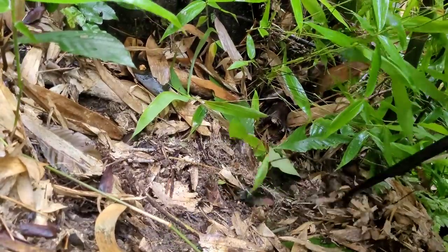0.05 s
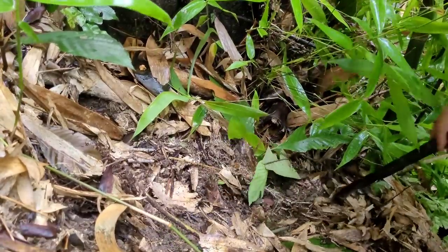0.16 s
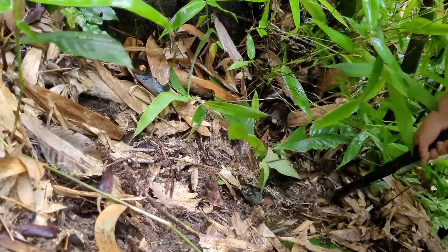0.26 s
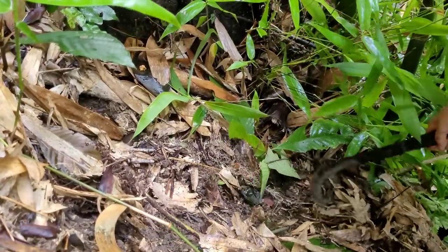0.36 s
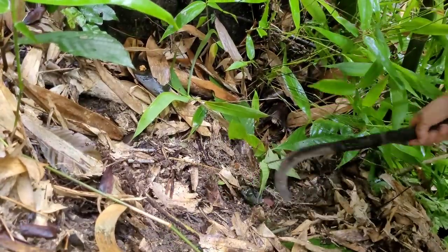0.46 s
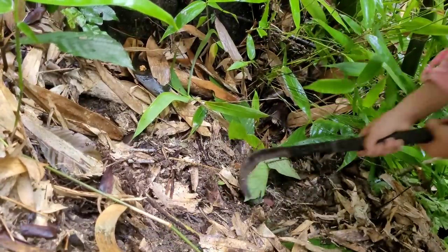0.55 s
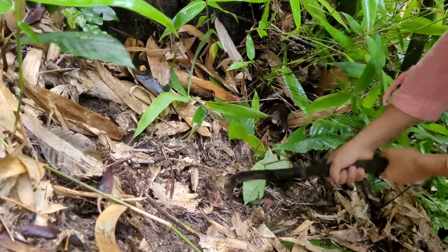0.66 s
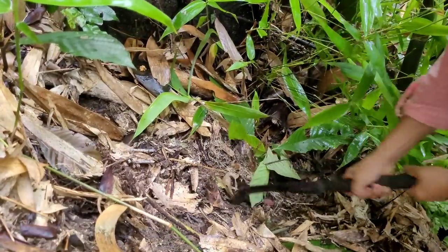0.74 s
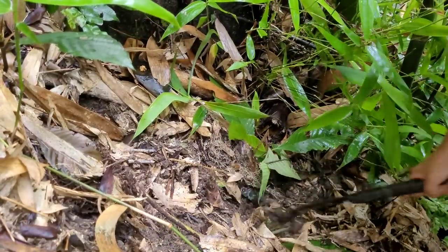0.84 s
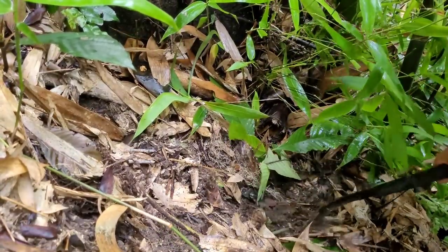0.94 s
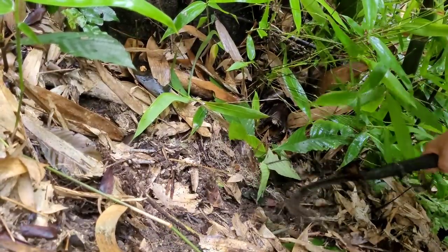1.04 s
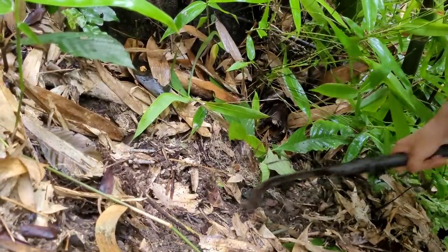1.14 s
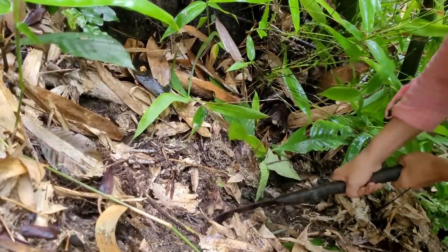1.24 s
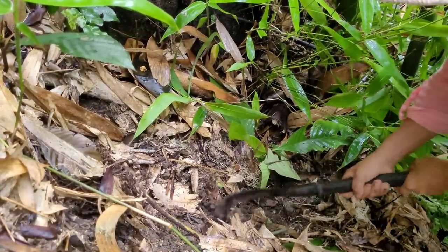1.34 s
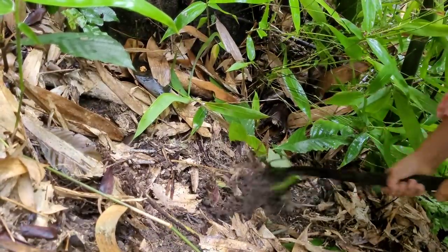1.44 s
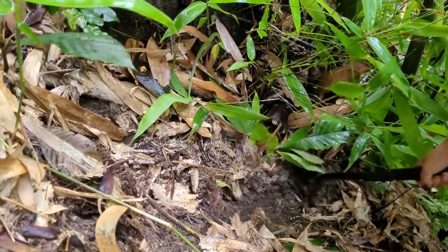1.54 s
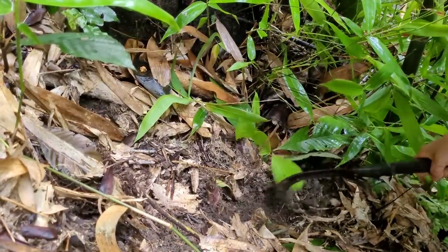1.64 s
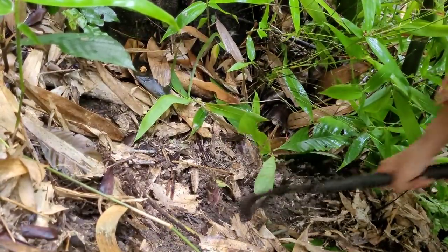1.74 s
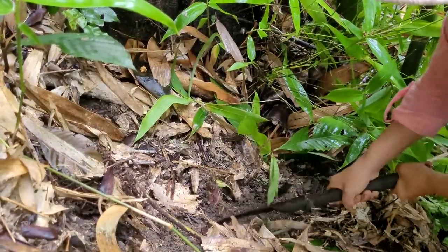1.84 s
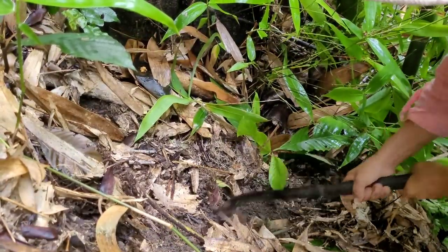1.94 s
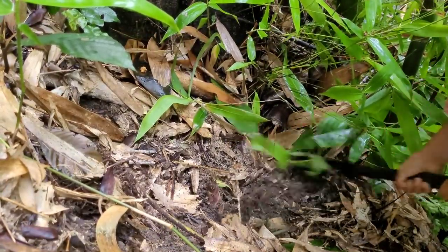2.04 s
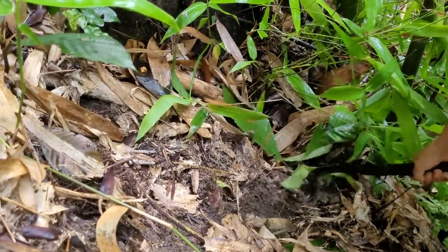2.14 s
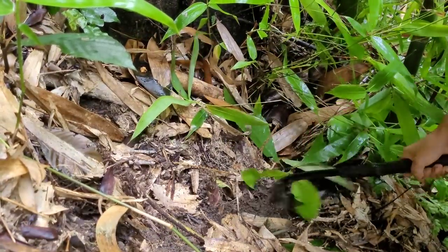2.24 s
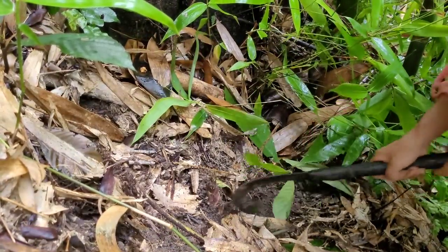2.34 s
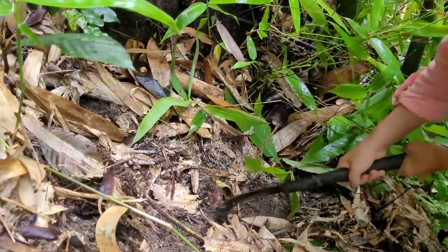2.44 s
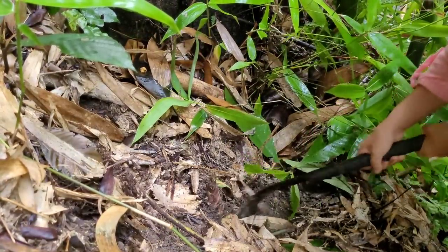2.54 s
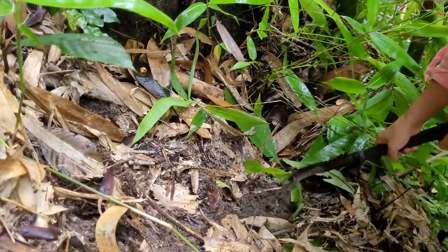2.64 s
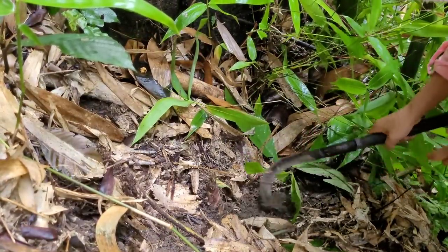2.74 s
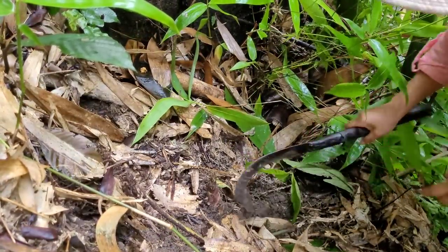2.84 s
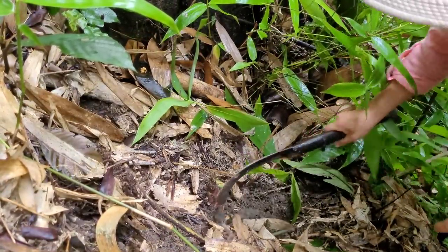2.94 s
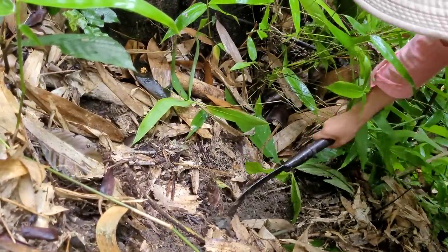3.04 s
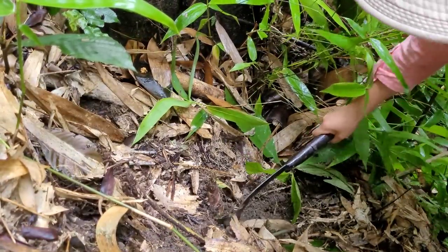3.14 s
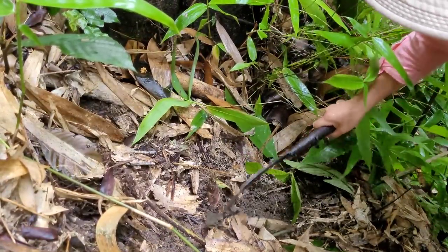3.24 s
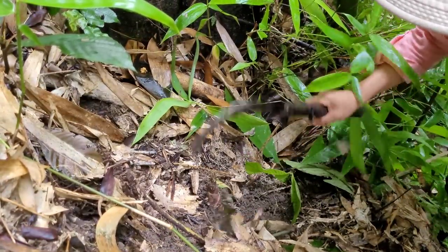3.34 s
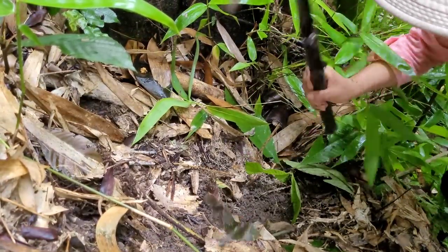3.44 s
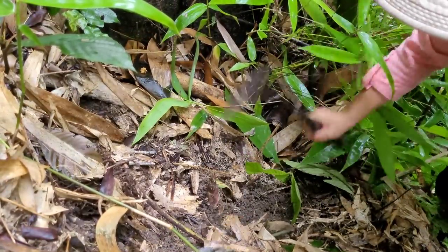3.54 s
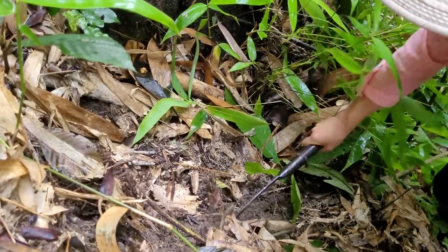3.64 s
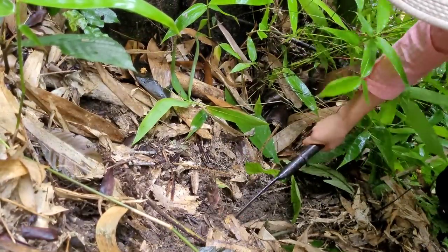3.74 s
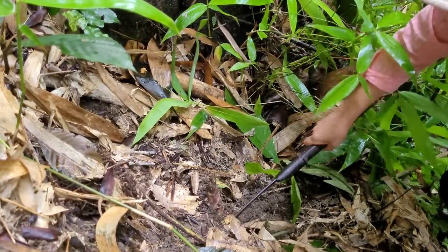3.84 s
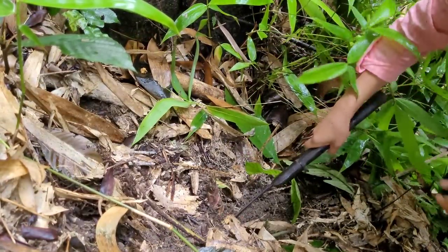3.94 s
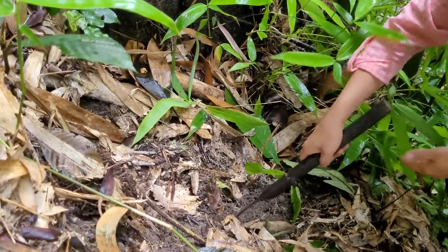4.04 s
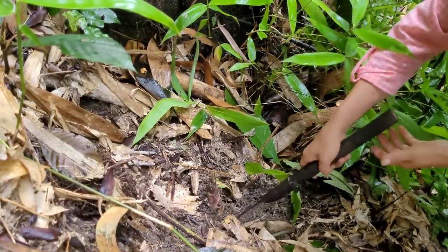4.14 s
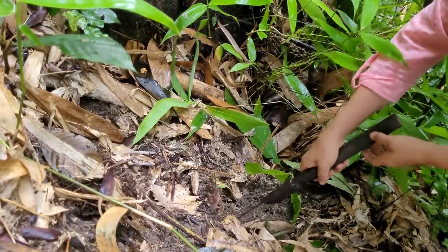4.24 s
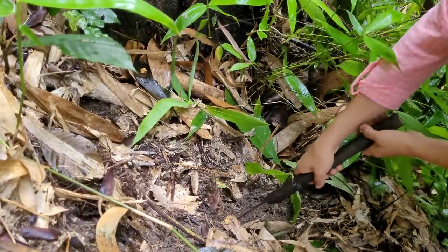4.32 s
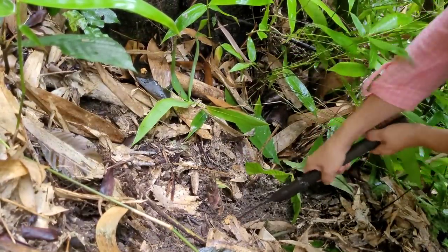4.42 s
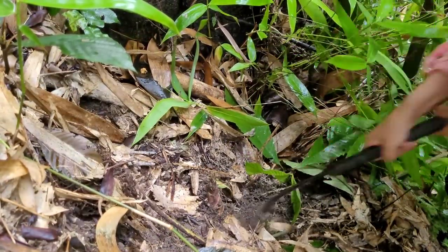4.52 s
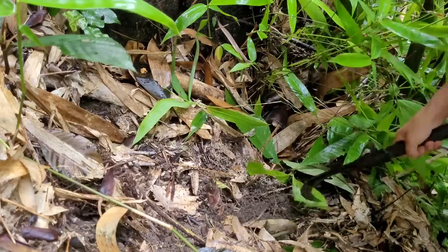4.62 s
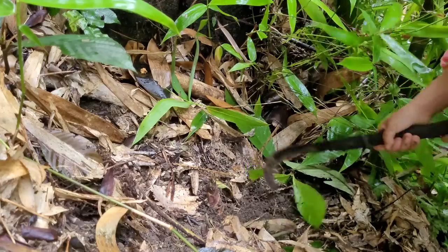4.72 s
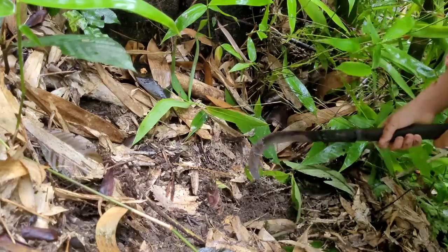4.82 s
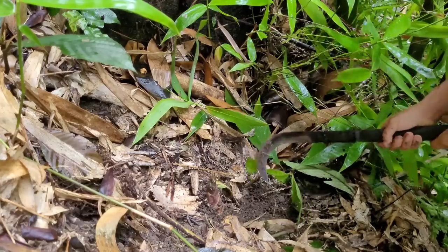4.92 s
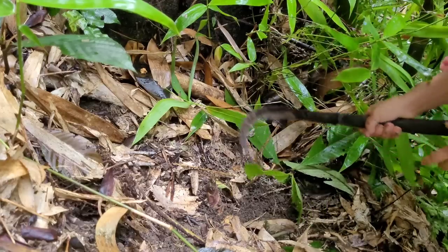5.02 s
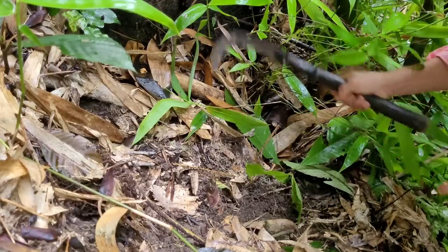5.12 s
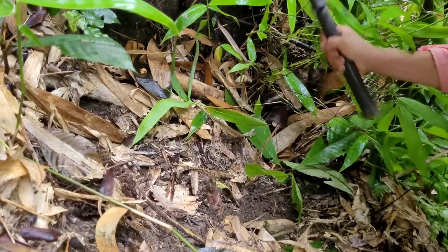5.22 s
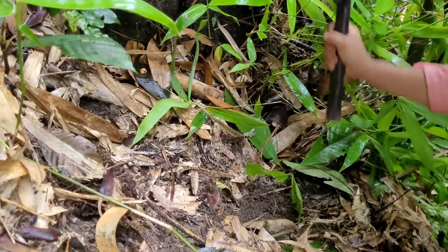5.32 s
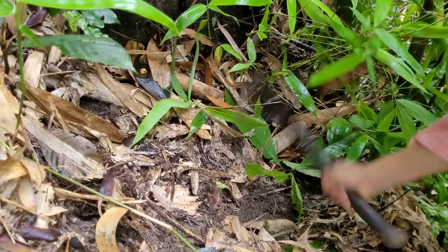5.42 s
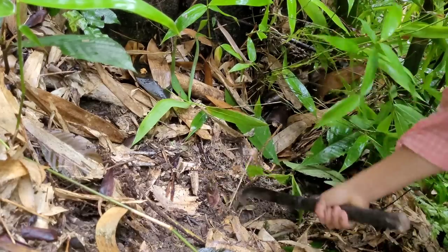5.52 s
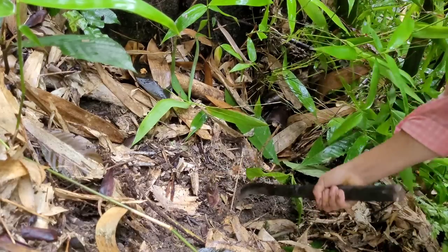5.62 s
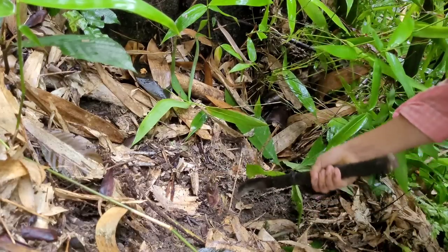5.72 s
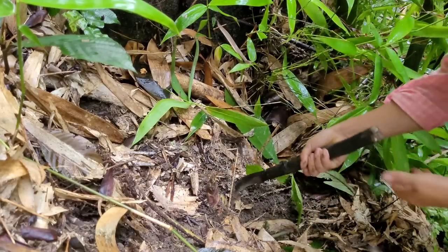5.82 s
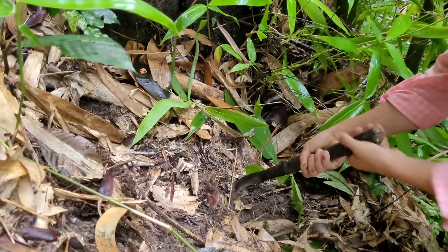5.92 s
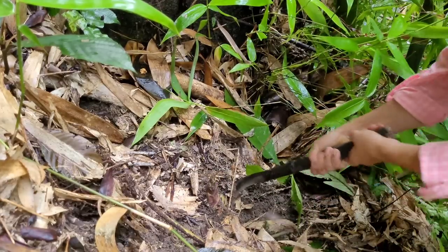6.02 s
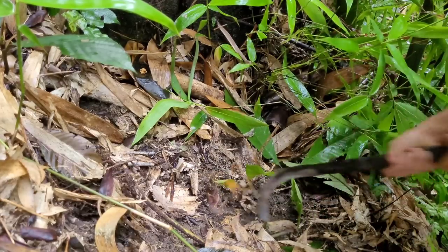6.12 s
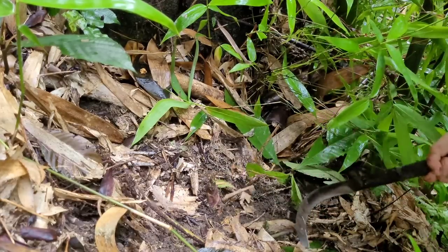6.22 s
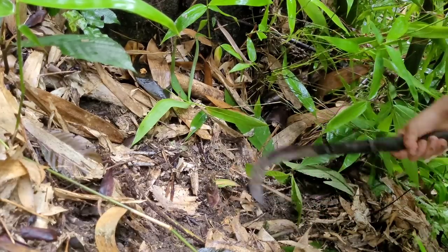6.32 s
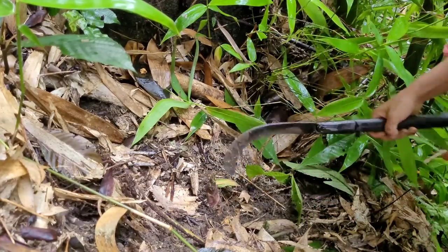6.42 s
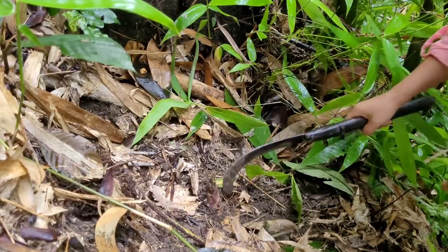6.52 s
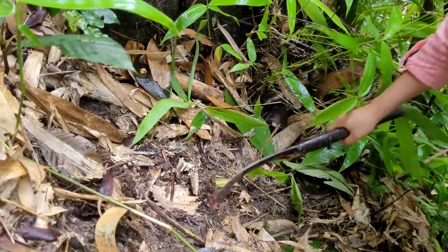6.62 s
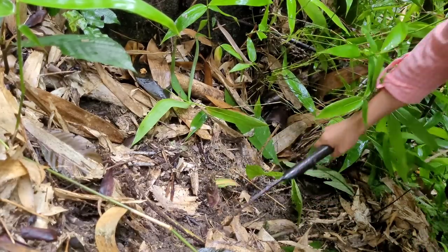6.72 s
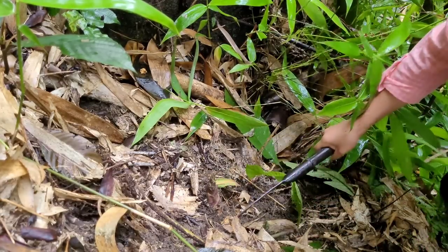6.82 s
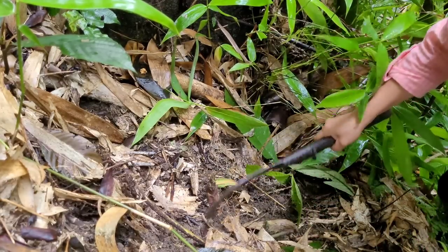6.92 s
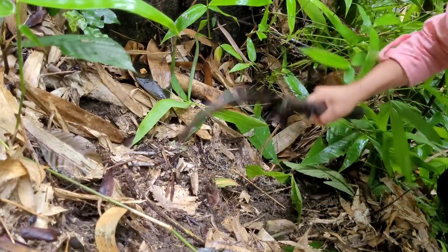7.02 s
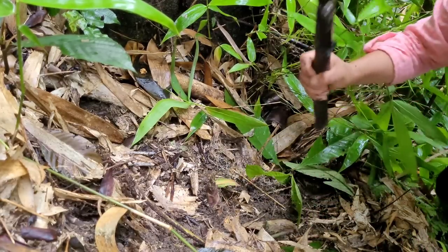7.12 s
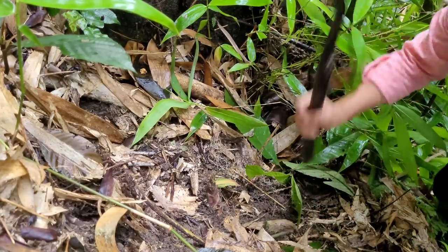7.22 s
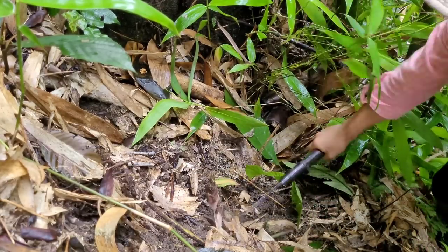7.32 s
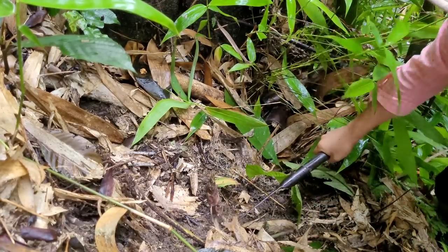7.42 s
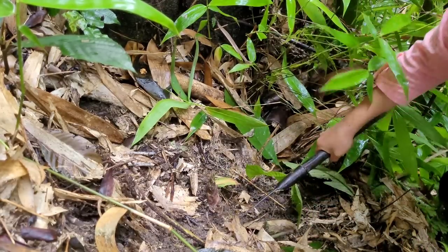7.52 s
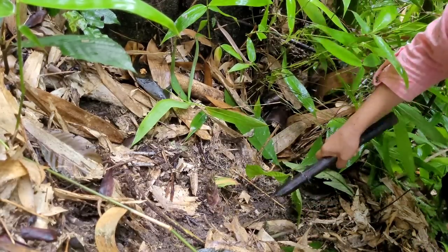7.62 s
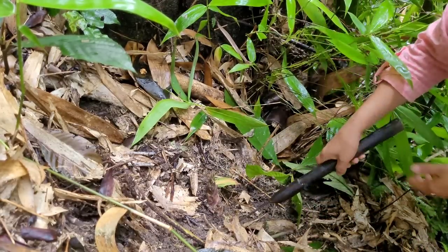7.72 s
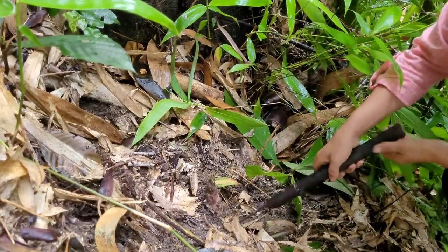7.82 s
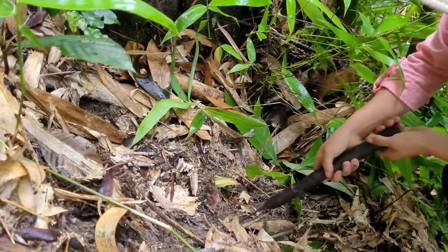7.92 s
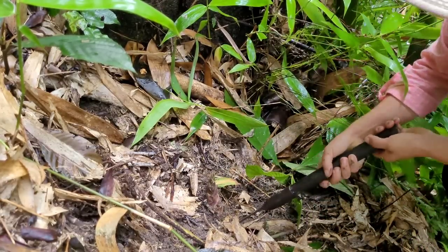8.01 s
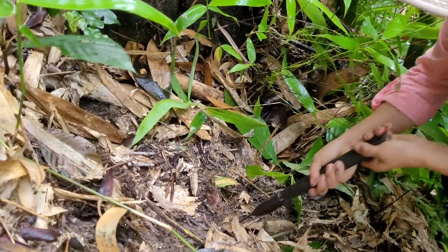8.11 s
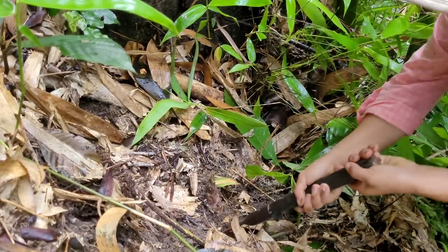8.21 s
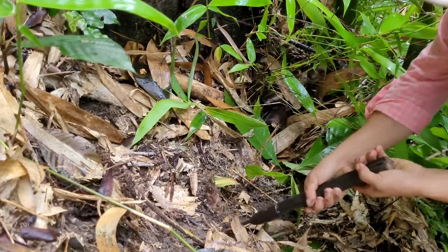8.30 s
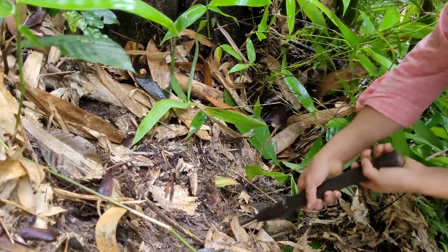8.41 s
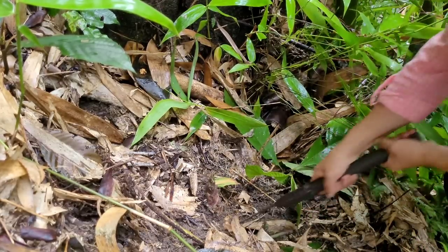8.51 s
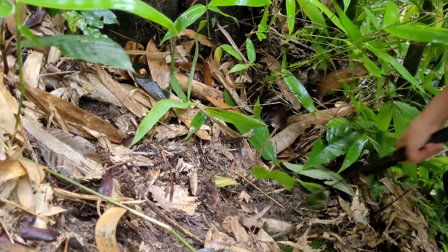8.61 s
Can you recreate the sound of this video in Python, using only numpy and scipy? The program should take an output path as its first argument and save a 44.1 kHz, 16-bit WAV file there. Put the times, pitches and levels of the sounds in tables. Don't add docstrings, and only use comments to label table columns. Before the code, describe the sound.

A long curved blade chops and rakes damp soil and leaf litter, crunches and dull thumps with rustling debris, over faint high insect hum.

```python
import sys
import numpy as np
from scipy import signal
from scipy.io import wavfile

SR = 44100
rng = np.random.default_rng(int(sys.argv[2]) if len(sys.argv) > 2 else 0)


def log_audio(samples):
    frames = np.atleast_2d(samples).T
    limited = np.clip(frames, -1, 1)
    pcm = np.round(limited * 32767).astype(np.int16)
    wavfile.write(sys.argv[1], SR, pcm)


def undo_db(level):
    steps = np.asarray(level, float) / 20
    return 10 ** steps


N = 381906
LEFT_RIGHT = np.array([[1], [-1]])


def rms_one(x):
    return x / np.sqrt(np.mean(x ** 2) + 1e-20)


def at_hz(points, hz):
    table_hz, values = np.array(points).T
    return np.interp(np.log(hz), np.log(table_hz), values)


def band(x, low_hz, high_hz):
    edges_hz = [low_hz, min(high_hz, .45 * SR)]
    return signal.sosfilt(signal.butter(2, edges_hz, "band", fs=SR, output="sos"), x)


def drift(rate):
    r = np.exp(-80 * np.pi * rate / SR)
    slow = signal.lfilter([1], [1, -2 * r, r * r], rng.standard_normal(N // 40 + 2002))[2000:]
    return np.interp(np.arange(N) / 40, np.arange(len(slow)), rms_one(slow))


def add(out, at_s, piece):
    i = round(at_s * SR)
    out[..., i:i + piece.shape[-1]] += piece[..., :N - i]


def pair(mid_side, alike):
    return np.sqrt(1 + alike) * mid_side[0] + np.sqrt(1 - alike) * mid_side[1] * LEFT_RIGHT


def grains(per_s, spread_db):
    present = rng.random(N) < per_s / SR
    sizes = undo_db(spread_db * np.minimum(rng.exponential(1, N), 4)) * present
    return sizes * rng.standard_normal((2, N))


def resonate(x, hz, t60_s):
    r, w = undo_db(-60 / (t60_s * SR)), 2 * np.pi * hz / SR
    return signal.lfilter([0, np.sin(w)], [1, -2 * r * np.cos(w), r * r], x)


def coloured(source, spectrum, low_hz, count, patchy_db, alike, lean):
    out, edges = 0, low_hz * 2 ** (np.arange(count + 1) / 3)
    for k, (low, high) in enumerate(zip(edges, edges[1:])):
        hz = np.sqrt(low * high)
        gain = (-1) ** k * undo_db(at_hz(spectrum, hz) + patchy_db * drift(9.3))
        sides = undo_db(at_hz(lean, hz) * LEFT_RIGHT / 2)
        noise = band(source[k % len(source)], low, high)
        out = out + gain * sides * pair(noise, np.clip(at_hz(alike, hz), 0, 1))
    return rms_one(out)


# (frequency [Hz], density [dB per Hz])
LEAVES = [(3000, -1.5), (4350, -1), (6500, -0.5), (8950, -2), (12300, -0.5), (16000, -11)]
# (frequency [Hz], density [dB per Hz])
SCRAPE = [(900, 0), (1400, -1), (2000, -3), (3000, -4)]
NEAR_LIKENESS = .85, [(1000, .7), (2800, .3)], [(3000, .2), (15000, .12)]
# (frequency [Hz], left minus right [dB])
NEAR_LEAN = [(1000, -4), (3000, 3), (6000, -3.5), (10000, 1), (15000, 3)]


def litter():
    soil_alike, twig_alike, leaf_alike = NEAR_LIKENESS
    crumbs = grains(10000, 2.9)
    leaves = -coloured([crumbs], LEAVES, 2830, count=8, patchy_db=1, alike=leaf_alike, lean=NEAR_LEAN)
    twigs = coloured([crumbs], SCRAPE, 891, count=5, patchy_db=3, alike=twig_alike, lean=NEAR_LEAN)
    soil = rms_one(pair(band(grains(2000, 3.0), 190, 750), soil_alike)) * undo_db(-.8 * LEFT_RIGHT)
    clumps_db = 1.2 * drift(35) - 3.0
    power = raking() * undo_db(2 * clumps_db)
    for at_s, db, t60_s, soil_db, twig_db, rise_s in crushes():
        t = np.arange(round(np.clip(t60_s, .008, 2) * SR)) / SR
        rise = 1 - np.exp(-t / np.clip(rise_s, .0003, .012))
        burst = rise * undo_db(db - 60 * t / t60_s)
        shares = undo_db([[-9], [twig_db - 0.5], [soil_db + 1.0]])
        add(power, at_s, (shares * burst) ** 2)
    return np.sum(np.sqrt(power)[:, None] * [leaves, twigs, soil], axis=0)


# (time [s], peak [dB], t60 [s], soil share [dB], twig share [dB])
BITES = [(0.7219, -23.5, 0.11, -9.5, -17), (0.879, -21, 0.1, -22, -13), (0.895, -17.5, .05, -25, -24.5),
         (1.29, -23.5, 0.083, -15, -15.5), (1.553, -22, 0.17, -14, -14), (1.869, -15.5, 0.1204, -14, -11),
         (2.115, -6.5, 0.025, -23, -24), (2.134, -24, 0.098, -4, -2), (2.5124, -19.5, 0.05, -7, -22),
         (3.1221, -12, 0.0307, -7, -10.5), (3.677, 2, 0.0432, -15.5, -17),
         (4.5413, -6.5, 0.1, -24.5, -10.5), (5.541, 5, 0.044, -14, -21), (6.1334, -13, .098, -17, -12.5),
         (6.143, -4.5, 0.13, -28.5, -22), (6.1776, -15, 0.05, -16, -15), (6.8265, -18.5, 0.052, -17, -9.5),
         (7.374, 5, 0.052, -19, -10.5), (7.385, 3, 0.05, -20.5, -19), (8.156, -33, 0.24, -17, -9),
         (8.253, -42, 0.058, -15.5, -18), (8.593, -13, 0.104, -17, -7), (8.602, -7, .1, -24.5, -15)]
# (time [s], peak [dB])
TOUCHES = [(1.864, -29), (2.1, -26), (3.662, -26), (3.67, -19), (4.5174, -34), (5.537, -18), (6.129, -17),
           (7.370, -29.5), (8.1284, -26.5), (8.141, -41), (8.5887, -23)]
# (time [s], peak [dB], t60 [s], twig share [dB])
SNAPS = [(0.0822, -36.5, 0.067, -22.5), (0.177, -28, 0.146, -16.5), (0.809, -31, 0.13, -10),
         (0.847, -24, .047, -12), (0.936, -28, .06, -32), (1.147, -24, 0.038, -21),
         (1.21, -28, 0.035, -11.5), (1.2989, -19, 0.085, -13.5), (2.008, -33, 0.096, -10.5),
         (2.046, -28, .13, -21.5), (2.346, -24.5, 0.0356, -22), (2.583, -25.5, 0.083, -25),
         (2.642, -32.5, 0.216, -16.5), (3.7678, -35.5, .066, -23.5), (3.8786, -30, 0.32, -15.5),
         (3.961, -24.5, 0.096, -14.5), (3.9902, -21.5, 0.036, -16), (4.056, -26, 0.39, -11.5),
         (5.744, -33.5, 0.11, -17.5), (5.8054, -22.5, 0.0493, -18), (5.8156, -26, 0.059, -17),
         (6.875, -32.5, 0.031, -23.5), (6.965, -27, 0.0386, -12), (7.033, -30, 0.285, -24.5),
         (7.54, -35.5, 0.1, -11), (7.8042, -41, 0.41, -2.5), (7.9921, -24, 0.079, -13.5),
         (8.0217, -23.5, 0.0646, -12.5), (8.047, -22, 0.044, -11.5), (8.203, -34, .03, -15)]
# (time [s], peak [dB], soil share [dB])
CLODS = [(.645, -55, 4), (0.674, -42, 10), (0.712, -26, 1.5), (4.0117, -34, -5.5), (5.116, -44, 2),
         (5.176, -49.5, 9), (5.2786, -27.5, -11.5), (5.297, -22.5, -11), (5.319, -25, -12),
         (5.432, -31, -9.5), (7.598, -32, -11), (7.7, -28.5, -12.5), (7.9744, -28.5, -7.5)]
# (time [s], peak [dB])
CRACKS = [
    (0.811, -18.5),
    (2.1151, 4),
    (6.08, -33.5),
    (6.184, -5.5),
    (7.374, -8.5),
    (8.157, -27),
    (8.207, -18),
    (8.246, -17),
]


def crushes():
    rows = [(*bite, 0.044 * bite[2]) for bite in BITES]
    for at_s, db, *_ in BITES:
        rows.append((at_s, -20.5 + 0.64 * db, 0.24, -34, -20, .01))
        rows.append((at_s, -34.5 + 0.2846 * db, 0.64, -25.5, -16, .01))
    rows += [(at_s, db, 0.0278, -31, -19, .012) for at_s, db in CRACKS]
    rows += [(at_s, db, 0.03, -23.5, -13.5, .0003) for at_s, db in TOUCHES]
    rows += [(at_s, db, t60_s, -22, twig_db, 0.0027) for at_s, db, t60_s, twig_db in SNAPS]
    rows += [(at_s, db, 0.064, soil_db, -19, 0.00341) for at_s, db, soil_db in CLODS]
    return rows


# (loudest time [s], leaves [dB], 20 dB climb [s], 20 dB fade [s], depth = soil share [dB])
STROKES = [(0.0, -40, .1, 0.54, -8.5), (0.82, -37.5, 0.2733, 0.305, -9), (1.29, -44, .35, 0.1, -14),
           (1.55, -39, 0.13, 0.22, -1.5), (2.128, -28, 0.01, 0.13, -4), (2.892, -43, 0.08, 0.2, -25),
           (3.11, -45, 0.13, 0, -18), (3.564, -49.5, 1.37, 0.7, -16.5), (3.95, -46, 0.2867, -0.33, 1.5),
           (5.236, -58, 1.25, 0.8, 5.5), (5.53, -48.5, 1.04, 0.4, -16), (6.75, -49.5, 0.24, 0.4, -28),
           (7.87, -42, 0.6, 0.02, -8.5), (8.1, -46.5, 0.2, 0.53, -8.5)]
# (start [s], length [s], leaves [dB], depth = soil share [dB])
DRAGS = [
    (0.64, 0.083, -62, 17.5),
    (4.016, 0.13, -38, -19),
    (4.54, 0.047, -30, -19),
    (5.127, .09, -68, 12),
    (6.134, 0.052, -33, -12),
    (7.81, 0.07, -43.5, -8),
    (8.15, 0.11, -33, -8),
]
# leaves, twigs, soil (level [dB])
STIR_DB = [-78, -80, -78]


def raking():
    power, t = np.outer(undo_db(STIR_DB) ** 2, np.ones(N)), np.arange(N) / SR
    drag_climb_s, drag_fade_s = 0.0249, 0.0238
    moves = [(at_s, 0, *rest) for at_s, *rest in STROKES]
    moves += [(*row, drag_climb_s, drag_fade_s, depth_db) for *row, depth_db in DRAGS]
    for at_s, hold_s, db, climb_s, fade_s, depth_db in moves:
        start = max(round((at_s - 3 * climb_s) * SR), 0)
        near = slice(start, round((at_s + hold_s + 3 * fade_s) * SR))
        before, after = (at_s - t[near]) / climb_s, (t[near] - at_s - hold_s) / fade_s
        level_db = db - 20 * np.maximum(np.maximum(before, after), 0)
        twig_db = -3.5 - 0.48 * abs(depth_db)
        power[:, near] += undo_db(level_db + [[0], [twig_db], [depth_db]]) ** 2
    return power


# (time [s], edge ring [dB], body [dB], struck spot's favoured frequency [Hz])
KNOCKS = [(1.8714, -34, -23.5, 750), (2.5118, -33, -22.5, 347.4), (2.514, -50, -34.5, 1700),
          (3.1212, -28.5, -33, 1100), (3.123, -51, -41, 350), (3.682, -12, -10.5, 344.4),
          (3.6815, -40, -35.5, 1000), (4.039, -45.5, -34, 476), (4.095, -46, -39, 1000),
          (4.5462, -20, -25, 1000), (5.54, -10.5, -14.5, 350), (5.541, -36, -13.5, 1790),
          (4.548, -44, -24.5, 690), (6.6382, -39, -46, 1600), (6.8285, -26, -19, 518),
          (6.9658, -27, -54, 1700), (7.3755, -27, -15.5, 1700), (7.388, -45, -32, 526),
          (1.885, -60, -36, 350), (2.522, -60, -33, 350), (3.13, -60, -33, 350), (5.298, -60, -36, 350),
          (7.376, -33, -22, 1400), (7.7038, -55, -43, 340), (7.7035, -50, -39, 1400),
          (7.757, -55, -44, 1400), (7.838, -55, -39, 1400), (8.156, -30, -33.5, 1000),
          (0.652, -60, -30, 517), (0.711, -60, -37.5, 520), (0.811, -34, -50, 1400), (1.87, -50, -24, 476),
          (8.604, -20, -37.5, 1000)]
# (frequency [Hz], level [dB], t60 [s], 1 = body / 0 = thin edge)
BLADE = [(350, 9, .035, 1), (474, 8, .035, 1), (690, 8, .03, 1), (1000, 8, .035, 1), (1400, 8, .03, 1),
         (1700, 8, .025, 1), (1880, -1, .03, 0), (2850, -15, .03, 0), (4250, -12, .03, 0),
         (5740, -14, .02, 0)]


def blade():
    out, t = np.zeros((2, N)), np.arange(SR // 5) / SR
    spot_db_per_octave = 30
    turns = rng.standard_normal((len(KNOCKS), len(BLADE)))
    for (at_s, edge_db, body_db, spot_hz), turn in zip(KNOCKS, turns):
        for (hz, mode_db, t60_s, body), k in zip(BLADE, turn):
            db = body_db - spot_db_per_octave * abs(np.log2(hz / spot_hz)) if body else edge_db
            lead = .6 * np.tanh(k) * min(hz / 2000, 1) * LEFT_RIGHT
            swell = (1 - np.exp(-t * hz / 1.58)) ** 2
            ring = np.sin(2 * np.pi * hz * t + lead)
            add(out, at_s, undo_db(db + mode_db - 60 * t / t60_s) * swell * ring)
    return out


# (time [s], push [dB], push frequency [Hz], after-swing [dB], swing frequency [Hz])
THUMPS = [(0.721, -36, 180, -50, 70), (1.883, -16.5, 108.7, -23.5, 63.5), (2.525, -15, 125.7, -27.5, 70),
          (3.132, -22, 118, -27, 77.5), (3.687, -13.5, 149, -18.5, 82), (4.556, -34, 97, -26.5, 64.4),
          (5.554, -20, 106, -22.5, 62.2), (6.147, -34.5, 100.2, -33, 54.5), (6.846, -35, 110, -34.5, 56),
          (7.394, -17, 121.4, -18, 67.7), (7.857, -34.5, 134, -34.5, 56.2), (8.621, -39, 101, -35, 60)]


def ground():
    out, t = np.zeros((2, N)), np.arange(SR // 2) / SR
    push_lead_s, swing_cycles = .02, 9.1
    leans = undo_db((1.1 * rng.standard_normal((len(THUMPS), 2, 1, 1)) - .3) * LEFT_RIGHT)
    for (at_s, push_db, push_hz, swing_db, swing_hz), lean in zip(THUMPS, leans):
        cycles = push_hz * (t - push_lead_s)
        push = undo_db(push_db + 1.0) * np.sin(2 * np.pi * cycles) * np.exp(-(cycles / 0.562) ** 2)
        fade = undo_db(swing_db - 60 * t * swing_hz / swing_cycles)
        swing = fade * (1 - np.exp(-t / 0.0082)) * np.sin(2 * np.pi * swing_hz * t)
        add(out, at_s - push_lead_s, lean[0] * push)
        add(out, at_s, lean[1] * swing)
    return out


# (time [s], level [dB], frequency [Hz])
REBOUNDS = [
    (1.8926, -29, 90),
    (2.536, -29, 110),
    (3.708, -27, 85),
    (5.575, -27.5, 85),
    (7.412, -21, 75),
]


def settling():
    out, power, t = np.zeros(N), np.zeros(N), np.arange(SR // 2) / SR
    for at_s, db, hz in REBOUNDS:
        cycles = hz * (t - .02)
        add(out, at_s - .02, -undo_db(db) * np.sin(2 * np.pi * cycles) * np.exp(-(cycles / 0.505) ** 2))
    rumble_db, rumble_t60_s = -11, 0.19
    for at_s, _, _, swing_db, _ in THUMPS:
        fade = undo_db(swing_db + rumble_db - 60 * t / rumble_t60_s)
        add(power, at_s, ((1 - np.exp(-t / 0.013)) * fade) ** 2)
    rumble = rms_one(pair(band(rng.standard_normal((2, N)), 43, 258), 0.86))
    return out + np.sqrt(power) * rumble


def brittle():
    t, power = np.arange(SR // 10) / SR, np.zeros(N)
    for at_s, db in CRACKS:
        add(power, at_s, undo_db(db - 11.5 - 60 * t / 0.024) ** 2)
    flutter_s, flutter_length_s, flutter_db = 5.7, 0.175, -48.5
    add(power, flutter_s, undo_db(flutter_db) ** 2 * np.hanning(round(flutter_length_s * SR)) ** .5)
    bright = signal.butter(2, 6580, "high", fs=SR, output="sos")
    return np.sqrt(power) * signal.sosfilt(bright, rng.standard_normal((2, N)))


# (time [s], peak [dB], ring frequency [Hz])
TICKS = [(0.7307, -25, 620), (0.81, -24.5, 1440), (0.8244, -29, 7130), (0.851, -32.5, 1060),
         (0.8556, -30, 7060), (0.884, -26, 7940), (0.8892, -23, 7080), (0.9081, -33, 1220),
         (0.9405, -36, 4500), (1.4994, -33, 600), (1.531, -30.5, 1720), (1.5561, -26, 1920),
         (1.562, -26, 2140), (2.1311, -16, 600), (2.1425, -26, 780), (2.1525, -22.5, 1360),
         (2.223, -31, 1960), (2.2535, -36.5, 2260), (3.9551, -33.5, 3140), (3.9707, -27, 3270),
         (3.9902, -28, 1830), (4.0131, -28, 3040), (4.019, -30, 2520), (4.0245, -30.5, 1100),
         (4.0395, -23.5, 2430), (4.0595, -21.5, 2950), (4.068, -25.5, 2950), (4.0961, -19.5, 7560),
         (4.1211, -22.5, 7860), (4.1405, -35, 8420), (5.276, -33, 7860), (5.2982, -26.5, 4600),
         (5.3208, -30, 6440), (6.1492, -5.5, 5560), (6.1563, -10.5, 5430), (6.1821, -11, 8290),
         (7.5397, -32, 7580), (7.6009, -35.5, 2940), (7.6498, -35, 1490), (7.6674, -34, 2860),
         (7.6869, -35, 6930), (7.704, -27, 1400), (7.7558, -29, 1400), (7.767, -30, 2130),
         (7.8037, -30, 7210), (7.8136, -36, 1360), (7.8406, -30, 1400), (7.8639, -27, 2060),
         (8.1302, -38.5, 1120), (8.1582, -22, 1880), (8.1806, -21, 746), (8.1927, -18.5, 1870),
         (8.2062, -20, 1500), (8.22, -19, 1590), (8.246, -19, 3080), (8.2558, -21, 7220),
         (8.2612, -20, 7200), (8.279, -30, 6650)]


def ticks():
    out, t = np.zeros((2, N)), np.arange(SR // 25) / SR
    chance = rng.standard_normal((len(TICKS), 3, len(t)))
    for (at_s, db, hz), (left, right, turn) in zip(TICKS, chance):
        rise = 1 - np.exp(-t / 0.00044)
        spit = band(pair([left, right], 0.33), 800, 12000) * undo_db(-7.5 - 60 * t / 0.018)
        lead = .7 * turn[0] * min(hz / 2000, 1) * LEFT_RIGHT
        ring_t60_s = 0.012 + 14 / hz
        ring = undo_db(-8 - 60 * t / ring_t60_s) * np.sin(2 * np.pi * hz * t + lead)
        add(out, at_s, undo_db(db) * rise * (spit + ring))
    return out


def grit():
    clicks, out = grains(500, 3.0) * np.sqrt(raking()[1]), 0
    for hz, mode_db, t60_s, _ in BLADE[1:]:
        struck = pair(clicks * rng.standard_normal(N) + 1e-18, .7)
        out = out + undo_db(0.033 * mode_db) * resonate(struck, hz, t60_s)
    return undo_db(-19.5) * out + undo_db(-6.5) * clicks


# (start [s], length [s], level [dB], favoured mode [Hz])
SCUFFS = [(.615, .125, -43.5, 476), (3.96, 0.164, -48.5, 470), (4.01, .12, -45.5, 1105),
          (4.01, 0.091, -45.5, 2920), (5.109, 0.102, -49, 377), (5.251, 0.082, -46.5, 380),
          (7.372, 0.031, -24, 4300), (7.759, .12, -53, 1400), (8.15, .115, -40.5, 800),
          (8.149, 0.11, -40.5, 1900), (8.209, 0.048, -41.5, 3030)]


def scuffs():
    out, t = np.zeros((2, N)), np.arange(round(.3 * SR)) / SR
    catches_per_s, ring_cycles, edge_s = 600, 25, .012
    for at_s, length_s, db, hz in SCUFFS:
        caught = rng.random(len(t)) < catches_per_s / SR
        size = undo_db(2.5 * np.minimum(rng.exponential(1, len(t)), 3))
        catches = pair(rng.standard_normal((2, len(t))), .75) * caught * size
        catches = catches * np.clip(np.minimum(t, length_s - t) / edge_s, 0, 1) + 1e-18
        rings = sum(resonate(catches, hz * ratio, ring_cycles / hz) for ratio in (.96, 1.05))
        add(out, at_s, undo_db(db) * rms_one(rings) * np.sqrt(length_s / .3))
    return out


# (time [s], pitch [Hz], level [dB])
WHISTLE = [
    (3.47, 4440, -56),
    (3.53, 4510, -52),
    (3.63, 4490, -67),
]
# (time [s], pitch [Hz], level [dB])
GLIDE = [
    (3.69, 4210, -52),
    (3.77, 4200, -46),
    (3.805, 4080, -45),
    (3.85, 3500, -46),
    (3.90, 3090, -49),
    (3.96, 2970, -53),
    (4.08, 2960, -55),
]
# (time [s], pitch [Hz], level [dB])
FAR_NOTES = [
    [(4.23, 4850, -75), (4.32, 4900, -75.5)],
    [(4.38, 5050, -70), (4.5, 5150, -71)],
    [(6.35, 3300, -64), (6.39, 3300, -66)],
    [(6.415, 2050, -60), (6.45, 2078, -67)],
    [(6.47, 2840, -61), (6.51, 2992, -55), (6.54, 2720, -60), (6.6, 2613, -66)],
    [(3.52, 4730, -54), (3.57, 4890, -59.5), (3.63, 4640, -75)],
    [(4.01, 2520, -58), (4.06, 2430, -61)],
]


def birds():
    out, wobble = np.zeros(N), 1 + .017 * drift(90)
    for note in [WHISTLE, GLIDE] + FAR_NOTES:
        s, hz, db = np.transpose(note)
        t = np.arange(s[0], s[-1], 1 / SR)
        edge = np.clip(np.minimum(t - s[0], s[-1] - t) / 0.0024, 0, 1)
        pitch_hz = np.interp(t, s, hz) * wobble[(t * SR).astype(int)]
        tone = np.sin(2 * np.pi * np.cumsum(pitch_hz) / SR)
        add(out, s[0], edge * undo_db(np.interp(t, s, db) + 8) * tone)
    out *= undo_db(2.5 * drift(60))
    t = np.arange(SR // 2) / SR
    scatter = rng.standard_normal((2, len(t))) * undo_db(-33.5 - 60 * t / .65)
    scatter[:, 0] = undo_db(-20)
    return signal.oaconvolve(out[None], scatter, axes=1)[:, :N]


# (frequency [Hz], density [dB per Hz])
AIR = [(30, 1.5), (64, 4), (110, -0.5), (175, -7.5), (285, 4.5), (440, -3.5), (700, -4), (1200, -12.5),
       (1840, -11.5), (2300, -18.5), (4370, -18.5), (6000, -23), (9000, -30), (16000, -33.5)]
# (frequency [Hz], likeness [0-1])
LIKENESS = [(60, 0.982), (130, 0.865), (290, 0.765), (640, 0.01733), (1400, 0.003)]
# (frequency [Hz], left minus right [dB])
FAR_LEAN = [(60, -1), (300, 0.5), (2000, -5), (12000, -4)]


def forest():
    noise = rng.standard_normal((2, 2, N))
    air = coloured(noise, AIR, 27.43, count=28, patchy_db=1.57, alike=LIKENESS, lean=FAR_LEAN)
    insect_hz, width_hz = 7343, 616
    chorus = band(rng.standard_normal((2, N)), insect_hz - width_hz / 2, insect_hz + width_hz / 2)
    shimmer = undo_db(0.8 * drift(11) + 0.4 * drift(2.5))
    return undo_db(-48.5) * air + undo_db(-53.5) * shimmer * rms_one(chorus)


def scene():
    work = litter() + blade() + ground() + settling() + brittle() + ticks() + grit() + scuffs()
    return work + birds() + forest()


def band_limit(x):
    return signal.sosfilt(signal.butter(12, 16640, fs=SR, output="sos"), x)


def record(dry):
    x = signal.sosfilt(signal.butter(3, 46, "high", fs=SR, output="sos"), dry)
    x = np.clip(x, -.88, .88)
    x = signal.sosfilt(signal.cheby2(10, 40, 16200, fs=SR, output="sos"), x)
    return band_limit(x)


dry = scene()
out = record(dry)
log_audio(out)
```